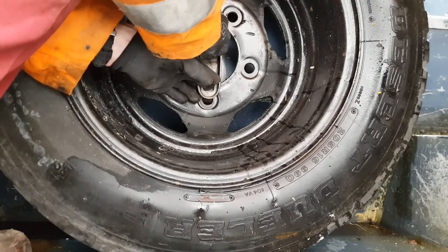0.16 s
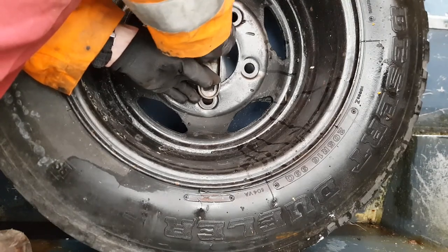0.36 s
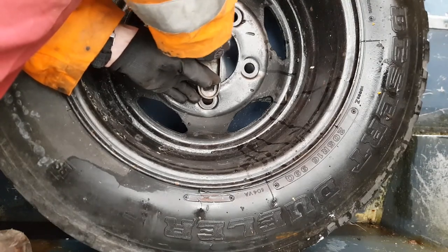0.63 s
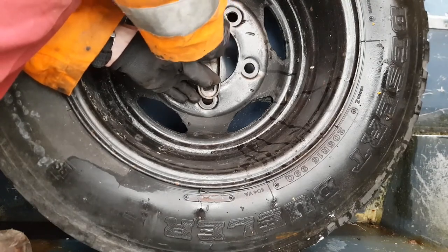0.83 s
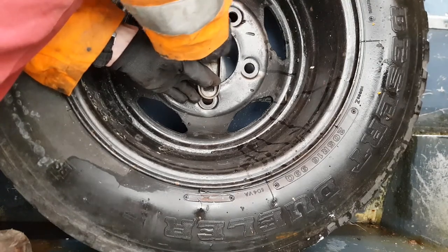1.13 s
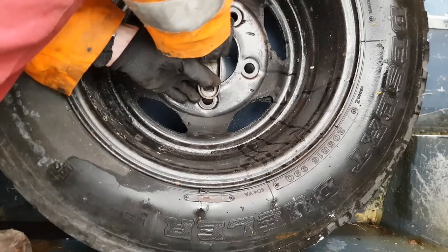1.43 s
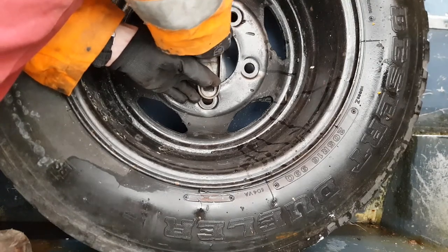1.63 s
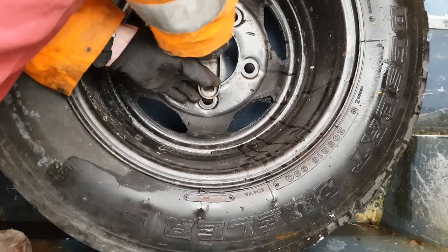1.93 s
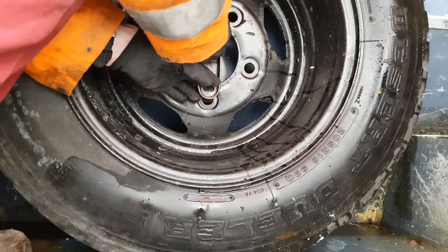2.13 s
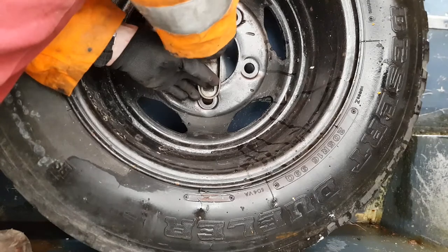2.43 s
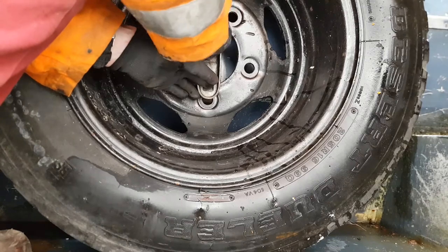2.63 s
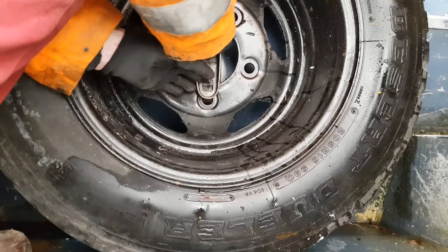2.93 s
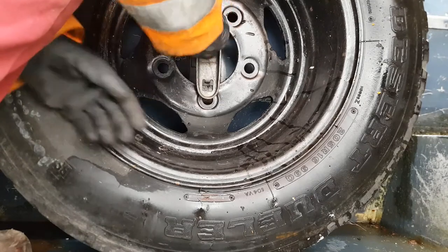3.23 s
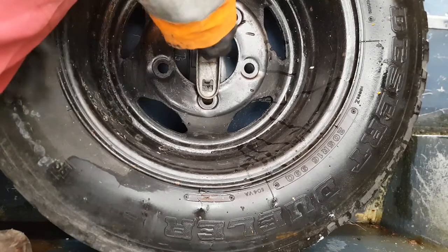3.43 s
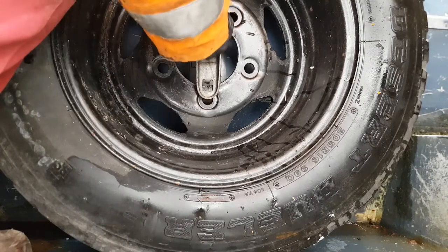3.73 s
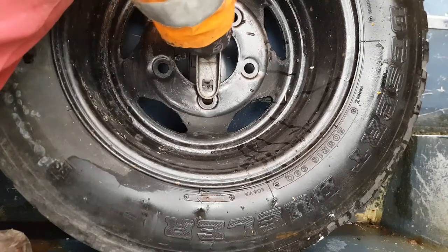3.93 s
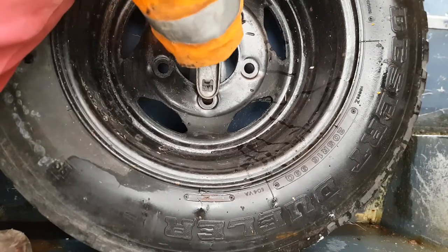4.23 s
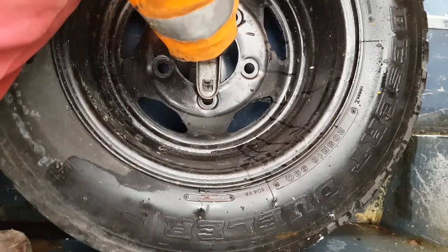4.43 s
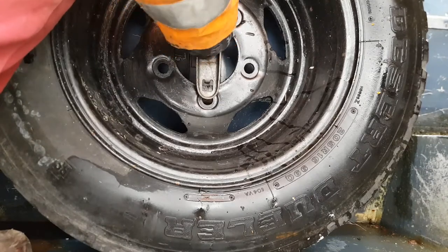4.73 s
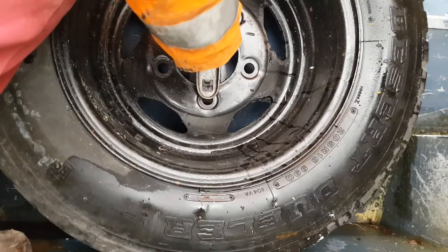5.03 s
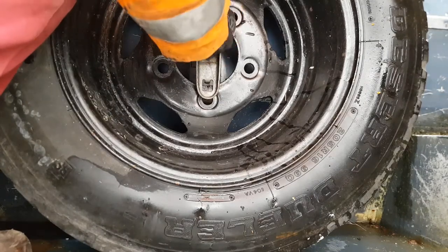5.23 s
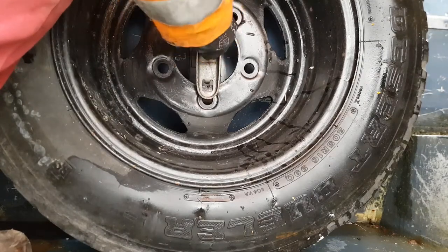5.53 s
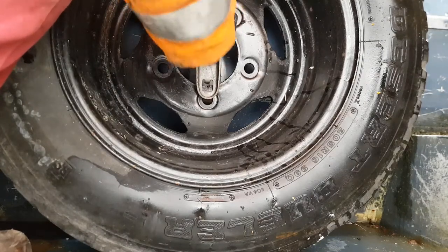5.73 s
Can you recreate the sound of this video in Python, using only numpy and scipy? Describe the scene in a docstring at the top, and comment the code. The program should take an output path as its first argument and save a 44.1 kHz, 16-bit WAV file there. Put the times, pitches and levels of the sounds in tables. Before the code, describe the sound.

Close to the microphone, outdoors, a nut is spun down a thread against the steel bracket of a spare wheel. Loose metallic clacks begin at once: uneven, crowded knocks with short hollow ringing, grouped in turns roughly every third of a second, the thread sticking and slipping between them. Around 2.1 to 2.4 s the nut seats; the bright clatter gives way to dull, low, clamped thuds. Turns at about 2.6, 3.1, 3.7, 4.4 and 5.3 s are slower, each a short swelling rumble with little treble. Jacket fabric swishes softly with the pushes; from 3.0 to 3.4 s a glove slides off, and a longer sleeve swish lasts until about 3.8 s. A faint low hum wavers near 4.0 to 4.4 s, with small dry ticks around 4.3, 5.1 and 5.7 s. Beneath lies a quiet, slowly swelling distant outdoor rumble with slight hiss.

```python
"""Loose steel clacks at once, close to the microphone: a gloved hand spins a nut down a threaded spigot
onto the bracket of a spare wheel. Knocks and the sticking, slipping thread drive the modes of the wheel;
as the nut seats, the bracket is clamped and the turns slow and dull to rumbles.
A jacket sleeve swishes close by as shaped noise, with a sliding glove, small dry ticks and a brief faint hum.
Behind them lies a faint low outdoor rumble of slowly swelling noise."""
import sys
import numpy as np
from scipy import signal
from scipy.fft import rfft, irfft, next_fast_len
from scipy.io import wavfile
from scipy.ndimage import uniform_filter1d

SR = 44100
rng = np.random.default_rng(int(sys.argv[2]) if len(sys.argv) > 2 else 0)


def bounce(signal):
    """Save signal as a 16-bit WAV file at the path given by the first command-line argument."""
    frames = np.transpose(np.atleast_2d(signal))
    limited = np.clip(frames, -1, 1)
    pcm = np.round(limited * 32767).astype(np.int16)
    wavfile.write(sys.argv[1], SR, pcm)


N = 258867
TIME = np.arange(N) / SR
EDGE_HZ = 16000

# the bracket strikes the wheel, levels before each register's gain: (t/s, thud/dB, clank/dB, tick/dB)
KNOCKS = [(0.002, -17, -32.5, -55), (0.178, -21, -32, -43.5), (0.245, -19, -27, -46.5),
          (0.27, -31, -32.5, -34.5), (0.364, -26, -40.5, -73), (0.473, -14, -35, -50),
          (0.528, -18, -33.5, -43.5), (0.549, -15, -26.5, -36.5), (0.621, -26, -40.5, -54),
          (0.683, -14, -32, -50), (0.805, -17.5, -25.5, -38.5), (0.879, -14.5, -25, -44),
          (0.895, -11.5, -32, -49), (0.984, -20, -26, -31), (1.157, -15, -25.5, -41.5),
          (1.193, -22, -46, -51), (1.239, -19, -29.5, -45), (1.281, -30, -34, -43),
          (1.476, -21.5, -37, -42), (1.544, -27, -29, -47), (1.578, -16.5, -25.5, -36.5),
          (1.782, -21.5, -32.5, -45), (1.861, -40, -32, -40.5), (1.889, -12, -31.5, -39),
          (1.915, -15, -27.5, -41), (1.93, -7.5, -54, -56), (1.981, -33, -37, -48.5),
          (2.026, -20.5, -41.5, -68), (2.133, -17, -38, -54.5), (2.194, -21, -37.5, -50),
          (2.221, -14, -35, -50.5), (2.266, -13, -32, -49.5), (2.288, -22.5, -43.5, -66),
          (2.622, -12.5, -45, -50), (2.683, -26, -50, -55), (3.136, -16, -31, -38),
          (3.182, -11.5, -56, -64), (3.259, -16.5, -41, -63), (3.724, -16, -43, -62),
          (3.744, -12, -44.5, -72), (3.855, -13, -45, -67), (4.524, -18.5, -42, -54),
          (4.549, -18, -41.5, -70), (5.361, -23.5, -43.5, -53)]
# turns of the nut, levels before gain: (start t/s, push length/s, boom/dB, ring/dB, clank/dB, sleeve/dB)
TURNS = [(-0.1, 0.095, -37.5, -29, -41, -84), (0.167, 0.16, -37.5, -32, -37.5, -75),
         (0.47, 0.17, -36.5, -28, -35.5, -65), (0.816, 0.19, -30.5, -25.5, -35, -59),
         (1.161, 0.2, -43.5, -26, -31.5, -67), (1.479, 0.14, -40.5, -28, -33.5, -64),
         (1.782, 0.18, -30, -24.5, -32, -61), (2.143, 0.19, -29, -26.5, -41, -60.5),
         (2.593, 0.16, -26.5, -25, -38.5, -61), (3.133, 0.16, -25.5, -23.5, -48, -67),
         (3.715, 0.2, -28.5, -29, -44.5, -59.5), (4.403, 0.23, -24.5, -33.5, -48, -64.5),
         (5.257, 0.21, -30.5, -38.5, -47.5, -58.5)]
NEXT_STARTS = [turn[0] for turn in TURNS[1:]] + [N / SR]
# strength of the stereo side signal, as reflected from the sides: (f/Hz, level/dB)
SIDE_STRENGTH = [(130, -30), (280, -13), (500, -3), (1000, 1), (2000, -.5)]
# the four registers boom, ring, clank and tick: (low f/Hz, high f/Hz)
REGISTERS = [(46, 170), (170, 550), (550, 3000), (3000, 17000)]


def amp(db):
    """Decibels to gain."""
    return 10 ** (np.asarray(db) / 20)


def unit(x):
    """Scales to rms 1."""
    return x / np.sqrt(np.mean(x ** 2) + 1e-20)


def read(points, hz):
    """Reads a table on a log-frequency axis."""
    f, value = np.transpose(points)
    return np.interp(np.log(hz + 1), np.log(f + 1), value)


def add(mix, s, sound):
    """Mixes a sound in at time s."""
    part = mix[max(round(s * SR), 0):][:len(sound)]
    part += sound[:len(part)]


def tint(x, spectrum):
    """Filters a signal by a smooth spectrum."""
    size = next_fast_len(x.shape[-1])
    gain = amp(read(spectrum, np.fft.rfftfreq(size, 1 / SR)))
    return irfft(rfft(x, size) * gain, size)[..., :x.shape[-1]]


def wander(per_s):
    """Smooth chance of rms 1 that changes about per_s times a second."""
    points = rng.standard_normal(8192)
    return unit(np.interp(TIME * per_s, np.arange(len(points)), points))


def slide(curve):
    """Gain along a level curve, silent outside it."""
    return amp(np.interp(TIME, *np.transpose(curve), left=-np.inf, right=-np.inf))


def air(gain_db=-2.0, swell_db=2, lowest_hz=35, rumble_hz=150):
    """Distant low rumble that swells and sinks, nearly alike at both ears, with a faint steady hiss."""
    # still air: (f/Hz, level/dB per Hz), shape only
    air_colour = [(12, -37), (20, 4.5), (65, 11), (365, -34), (843, -57), (1110, -33), (1950, -75),
                  (2180, -24.5), (3500, -59), (7440, -27), (15800, -71)]
    air_db = -51.5 + gain_db
    mid, side = (unit(tint(rng.standard_normal(N), air_colour)) for _ in range(2))
    rumble = signal.filtfilt(*signal.butter(2, rumble_hz, fs=SR), mid)
    mid = mid + rumble * (amp(swell_db * wander(9)) - 1)
    side = tint(side, SIDE_STRENGTH)
    highpass = signal.butter(2, lowest_hz, "high", fs=SR)
    return signal.lfilter(*highpass, [mid + side, mid - side]) * amp(air_db)


def swish(level, colour, gain_db, crinkle_db=1.2, lean_db=0.2):
    """Cloth slides along: countless fibres catch, in small clumps."""
    fibres = rng.standard_normal((2, N)) * amp(crinkle_db * wander(90))
    return unit(tint(fibres, colour)) * level * amp(gain_db + np.array([[-lean_db], [lean_db]]))


def glove():
    """The glove slides off the wheel with a duller sound than the sleeve."""
    # course of the slide, before gain: (t/s, level/dB)
    slide_level = [(2.96, -56), (3.04, -46.5), (3.25, -44.5), (3.4, -68)]
    # spectrum of its rubbing, shape only: (f/Hz, level/dB per Hz)
    glove_colour = [(150, -15), (450, 4), (2500, 5), (7800, -6), (9500, -29)]
    return swish(slide(slide_level), glove_colour, gain_db=-1.0)


def swings(rows):
    """Speed of the arm over smooth swings (middle s, half length s, dB)."""
    t = TIME[::64]  # slow enough to compute coarsely
    power = sum(amp(db) ** 2 * np.exp(-np.minimum(((t - s) / width) ** 2, 20)) for s, width, db in rows)
    return np.interp(TIME, t, np.sqrt(power))


def sleeve():
    """The sleeve swings forward with each push and back in each pause; once the arm draws right away."""
    # cloth on the forward swing, shape only: (f/Hz, level/dB per Hz)
    cloth_colour = [(180, -2), (300, -3), (493, -5), (853, -5), (1090, -6.5), (1380, -5.5), (1890, -6.5),
                    (15800, -10.5)]
    # the thinner swish of the swing back, shape only: (f/Hz, level/dB per Hz)
    return_colour = [(300, -24), (1500, -7.5), (3200, -1), (7500, -4), (15800, -5.5)]
    # the arm shifts its grip in the longer pauses, before gain: (middle t/s, half length/s, level/dB)
    regrips = [(2.85, 0.23, -62), (4.355, 0.068, -62.5), (5.18, 0.041, -66), (5.72, 0.049, -72)]
    # long swish as the arm draws back from the wheel, before gain: (t/s, level/dB)
    withdrawal = [(2.93, -72), (3.038, -51.5), (3.397, -49.5), (3.472, -45.5), (3.6, -49.5), (3.7, -60.5),
                  (3.85, -72)]
    # the sleeve never quite rests; these levels too are before gain
    crest_s, width_s, rest_db = 0.13, 0.085, -74
    return_share, return_width_s, return_db = 0.35, 0.052, -63  # share of the pause before the swing back
    pushes = [(turn[0] + crest_s, width_s, turn[5]) for turn in TURNS]
    forward = swings(pushes + list(regrips))
    ends = np.array([turn[0] + turn[1] for turn in TURNS])
    return_times = ends + return_share * (NEXT_STARTS - ends)
    back = swings([(s, return_width_s, return_db) for s in return_times])
    speed = np.sqrt(forward ** 2 + slide(withdrawal) ** 2 + amp(rest_db) ** 2)
    return swish(speed, cloth_colour, gain_db=9.0) + swish(back, return_colour, gain_db=7)


def ticks(fade_s=0.0062):
    """Tiny crisp ticks from the jacket: short dry noise snaps with no low end."""
    # snaps, before the high-pass: (t/s, level/dB)
    snaps = [(4.342, -43), (4.401, -52.5), (5.083, -57.5), (5.73, -48.5)]
    out, t = np.zeros(N), TIME[:SR // 20]
    for s, db in snaps:
        add(out, s, amp(db) * np.exp(-t / fade_s) * rng.standard_normal(len(t)))
    return signal.lfilter(*signal.butter(2, REGISTERS[3][0], "high", fs=SR), out)


def hum(gain_db=-7.5, waver_db=2):
    """A faint low sine between two late turns; its level wavers and its pitch sags."""
    # course of the tone, before gain: (t/s, f/Hz, level/dB)
    tone = [(3.98, 259, -37), (4.14, 255, -60), (4.222, 235, -54.5), (4.38, 238, -39.5)]
    s, hz, db = np.transpose(tone)
    level_db = np.interp(TIME, s, db, left=-np.inf, right=-np.inf) + gain_db + waver_db * wander(14)
    level = uniform_filter1d(amp(level_db), SR // 20)
    phase = 2 * np.pi * np.cumsum(np.interp(TIME, s, hz)) / SR
    return level * np.sqrt(2) * np.sin(phase)


def turn_number():
    """Which turn of the nut is under way at each moment, counted from just before its start."""
    return np.searchsorted([turn[0] for turn in TURNS], TIME + .05)


def effort(axis, swell_db, sag_db_per_s, release_s, linger, linger_s):
    """Level of the turns in one register: each catches, swells, sags and is released, leaving a faint rattle."""
    catch_s, crest_s = 0.0093, 0.091
    settle_s = 0.045  # the rattle dies away as the fingers take hold for the next turn
    now = np.searchsorted(NEXT_STARTS, TIME, side="right")
    columns = np.transpose(TURNS)
    t, length = TIME - columns[0][now], columns[1][now]
    swell = -swell_db * np.maximum(1 - t / crest_s, 0)
    sag = -sag_db_per_s * np.maximum(np.minimum(t, length) - crest_s, 0)
    after = np.maximum(t - length, 0)
    release = (np.exp(-after / release_s) + linger * np.exp(-after / linger_s)) / (1 + linger)
    until_next = np.take(NEXT_STARTS, now) - TIME
    grip = np.clip(np.minimum(t / catch_s, until_next / settle_s), 0, 1)
    return amp(columns[axis][now] + swell + sag) * release * grip


def grind(level, gain_db, rub, lumpy_db, slips_per_s):
    """Force of the turning thread: it sticks and slips at uneven moments, and rubs in between."""
    moment, size, way = rng.random((4096, 3)).T
    at = ((np.arange(len(moment)) + moment) * SR / slips_per_s).astype(int)
    slips = np.bincount(at, np.sign(way - .5) * amp(lumpy_db * (2 * size - 1)), N)[:N]
    return level * amp(gain_db) * unit(unit(slips) + rub * rng.standard_normal(N))


def blows(levels, gain_db, contact, rise_s, chatter_s, tail, tail_s, colour_db=4.0):
    """Force of the knocks: the steel scrapes up to a contact, chatters and leaves a weak scattered tail."""
    lead = SR // 40  # samples of scrape before the contact
    force, t = np.zeros(N), TIME[:SR // 4] - TIME[lead]
    fade = np.exp(-abs(t) / chatter_s) + tail * np.exp(-abs(t) / tail_s)
    fade *= np.exp(np.minimum(t, 0) / rise_s)
    hz = np.geomspace(500, EDGE_HZ, 20)
    for row, db in zip(KNOCKS, levels):
        # each knock lands on another spot and so has its own colour
        spot = np.transpose([hz, colour_db * rng.standard_normal(len(hz))])
        blow = tint(fade * rng.standard_normal(len(t)), spot)
        blow[lead] += contact * np.linalg.norm(blow)
        blow *= amp(db + gain_db) * np.sqrt(SR / 100) / np.linalg.norm(blow)
        # a scrape that would begin before time zero is cut off there
        add(force, row[0] + t[0], blow[max(lead - round(row[0] * SR), 0):])
    return force


def steel(modes, body, body_db, band):
    """Causal impulse response of one register: sharp modes standing on a dense body, energy 1."""
    # ring time of the modes: (f/Hz, t60/s)
    ring_time = [(70, 0.42), (250, 0.22), (800, 0.13), (2400, 0.028), (7000, 0.0048)]
    # how unevenly the countless weak modes fill the body: (f/Hz, rms level/dB)
    unevenness = [(500, 0.6), (1200, 2), (5000, 5)]
    taps = 16384
    bins = np.fft.rfftfreq(taps, 1 / SR)
    ripple = rng.standard_normal(len(bins))
    ripple = unit(uniform_filter1d(uniform_filter1d(ripple, size=14), size=14))
    dense = amp(read(body, bins) + read(unevenness, bins) * ripple) ** 2
    power = amp(body_db) ** 2 * dense / dense.sum()
    for hz, db in modes:
        half_width = np.log(1000) / (2 * np.pi * read(ring_time, hz))
        # a resonance peak with its far skirts cut away
        peak = 1 / (1 + ((bins - hz) / half_width) ** 2) / (1 + ((bins - hz) / (hz / 4)) ** 4)
        power = power + amp(db) ** 2 * peak / peak.sum()
    power = power / (1 + (band[0] / (bins + 1)) ** 10) / (1 + (bins / band[1]) ** 10)
    # folding the cepstrum gives minimum phase: the response starts at once
    cepstrum = irfft(np.log(power / power.max() + 1e-10) / 2)
    cepstrum[1:taps // 2] *= 2
    cepstrum[taps // 2 + 1:] = 0
    response = irfft(np.exp(rfft(cepstrum)))[:taps // 2]
    return response / np.linalg.norm(response)


def shaken(force, modes, body, body_db, band, shift_db=2.0, modes_db=-1.0, count=3):
    """The bracket rests differently from turn to turn, in a cycle of rests, so other modes stand out."""
    rest_now, sound = turn_number() % count, np.zeros(N)
    for rest in range(count):
        shifted = [(hz, db + modes_db + shift_db * rng.uniform(-0.93, 1)) for hz, db in modes]
        sound += signal.oaconvolve(force * (rest_now == rest), steel(shifted, body, body_db, band))[:N]
    return sound


def wheel(loose_db=-32, clamped_db=-30, seating_s=2.13, seated_s=2.36):
    """Knocks and grinding drive the wheel; its loose modes give way to clamped ones as the nut seats."""
    # modes of wheel and bracket, before their shift at each rest: (f/Hz, level/dB)
    loose_modes = [(228.8, -31), (255.7, -33.5), (305.5, -36), (356.6, -47), (403.7, -43), (433.4, -41.5),
                   (608.3, -48.5), (741.5, -44), (854.6, -48.5), (923.2, -48), (977.1, -46),
                   (1134.5, -49.5), (1266.4, -53), (1419.8, -50.5), (1549.0, -54.5), (1601.5, -49),
                   (2355.2, -51.5), (2453.4, -53.5), (2718.6, -61), (4614.8, -62), (5005.1, -89),
                   (7280.9, -62.5)]
    clamped_modes = [(66, -33), (134, -40), (230, -45), (269, -43), (355, -61.5), (436, -55.5),
                     (463, -63.5), (576, -60.5), (775, -64)]
    # dense, quickly damped response between the modes, shape only: (f/Hz, level/dB per Hz)
    loose_body = [(21, -47.5), (35, -24), (70, 3.5), (171, -6.5), (244, -1), (440, -8.5), (500, -16),
                  (753, -15), (1320, -18.5), (2380, -22), (3680, -39.5), (4510, -37.5), (5260, -42),
                  (7530, -47), (15800, -54)]
    clamped_body = [(18, -60), (30, -60), (69, 9.5), (134, 0.5), (183, -9), (264, -8.5), (344, -25.5),
                    (459, -27), (645, -32), (775, -29.5), (1210, -34), (1450, -31), (2950, -48.5),
                    (15800, -66)]
    # the tighter the nut, the more a knock moves the whole wheel: (t/s, boom level above the thud/dB, before gain)
    boom_share = [(1.6, -30), (1.9, -12), (2.25, -9.5), (3.1, -11)]
    s, ring, clank, tick = np.transpose(KNOCKS)
    boom = ring + np.interp(s, *np.transpose(boom_share))
    heave = effort(axis=2, swell_db=6.5, sag_db_per_s=43, release_s=0.027, linger=0.16, linger_s=0.2)
    judder = effort(axis=3, swell_db=5, sag_db_per_s=69.5, release_s=0.025, linger=0.12, linger_s=0.24)
    scrape = effort(axis=4, swell_db=9, sag_db_per_s=81.5, release_s=0.0083, linger=0.29, linger_s=0.29)
    snap_s = .0016  # the treble of a contact rises fastest
    forces = [
        blows(boom, gain_db=2.5, contact=3.3, rise_s=0.0091, chatter_s=0.0038, tail=0.112, tail_s=0.031)
        + grind(heave, gain_db=0.0, rub=0.48, lumpy_db=0.5, slips_per_s=55),
        blows(ring, gain_db=-8, contact=2.05, rise_s=0.016, chatter_s=0.044, tail=0.15, tail_s=0.041)
        + grind(judder, gain_db=-1.0, rub=0.43, lumpy_db=2, slips_per_s=70),
        blows(clank, gain_db=-1.0, contact=0.096, rise_s=2 * snap_s, chatter_s=0.025, tail=0.13, tail_s=0.019)
        + grind(scrape, gain_db=-6.5, rub=1, lumpy_db=1, slips_per_s=200),
        blows(tick, gain_db=3.0, contact=0.23, rise_s=snap_s, chatter_s=0.011, tail=0.21, tail_s=0.026)
        + grind(scrape, gain_db=-17, rub=1.7, lumpy_db=-4, slips_per_s=280)]
    # equal-power crossfade from loose to clamped
    clamp = np.clip((TIME - seating_s) / (seated_s - seating_s), 0, 1) * np.pi / 2
    sound = np.zeros(N)
    for force, band in zip(forces, REGISTERS):
        sound += shaken(force * np.cos(clamp), loose_modes, loose_body, loose_db, band)
        sound += shaken(force * np.sin(clamp), clamped_modes, clamped_body, clamped_db, band)
    return sound


def spread(x, fade_s=0.0051, lean_db=0.22, count=5):
    """The low tones reach the right ear first; quick reflections off the rim and the moving arm widen the rest."""
    lag_s, shadow_hz = .0002, 600
    t, turn, side = TIME[:SR // 10], turn_number(), np.zeros(N)
    for pose in range(count):
        echoes = rfft(rng.standard_normal(len(t)) * np.exp(-t / fade_s))
        # even out the echo spectrum
        echoes = irfft(echoes / np.sqrt(uniform_filter1d(abs(echoes) ** 2, size=12)))
        side += signal.oaconvolve(x * (turn % count == pose), echoes[:len(t) // 2])[:N]
    # subtracting the slope of the lows delays them on the left and advances them on the right
    lows = signal.filtfilt(*signal.butter(2, shadow_hz, fs=SR), x)
    side = tint(side, SIDE_STRENGTH) - np.gradient(lows) * SR * lag_s / 2
    return np.array([(x + side) * amp(lean_db), (x - side) * amp(-lean_db)])


def scene():
    """Wheel, hum and ticks spread in stereo, with sleeve, glove and open air."""
    return spread(wheel() + hum() + ticks()) + sleeve() + glove() + air()


def record(dry):
    """The recorder's band limit, a linear-phase low-pass."""
    lowpass = signal.firwin(511, EDGE_HZ, window=("kaiser", 9), fs=SR)
    return signal.oaconvolve(dry, lowpass[None], "same", axes=1)


dry = scene()
out = record(dry)
bounce(out)
```